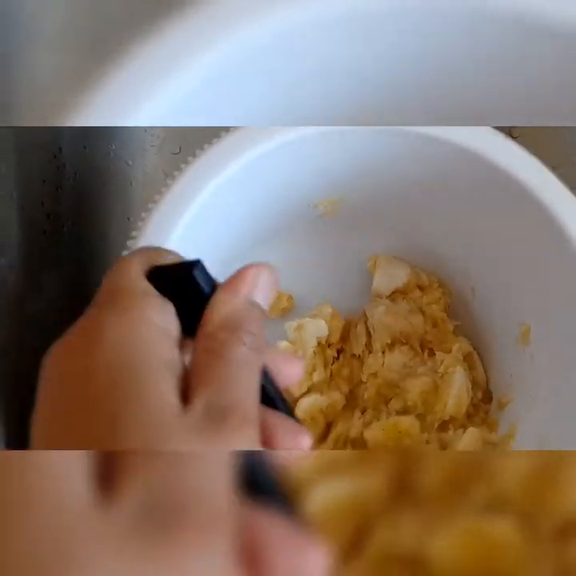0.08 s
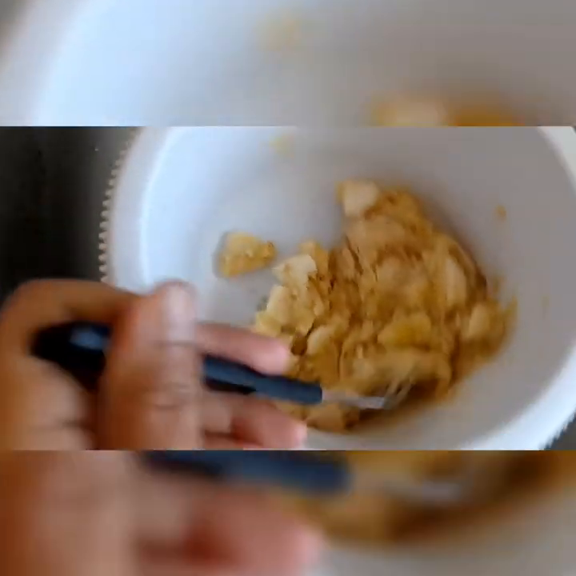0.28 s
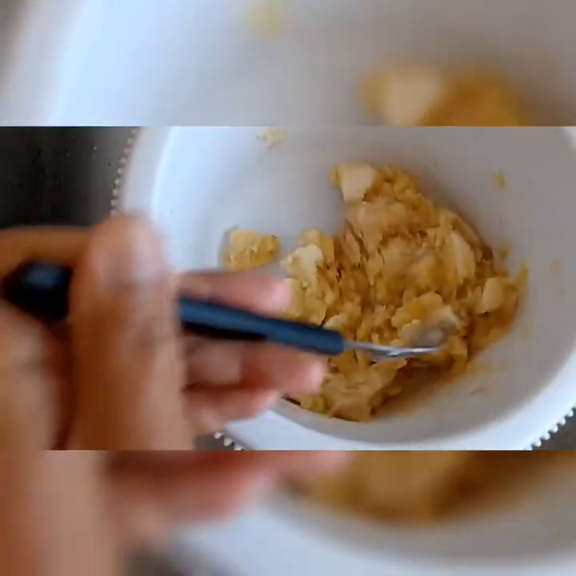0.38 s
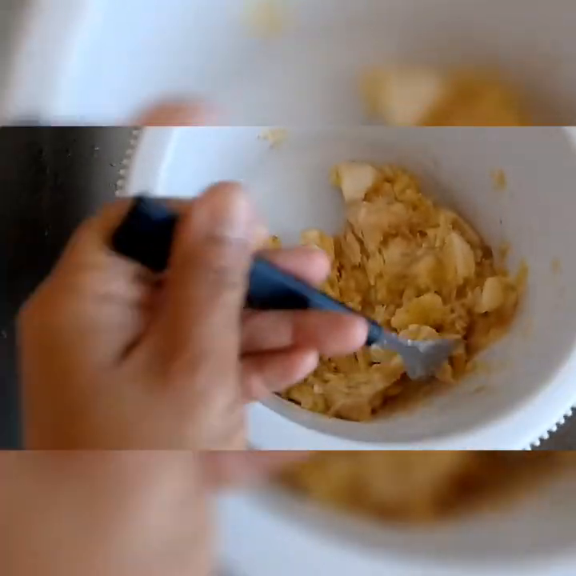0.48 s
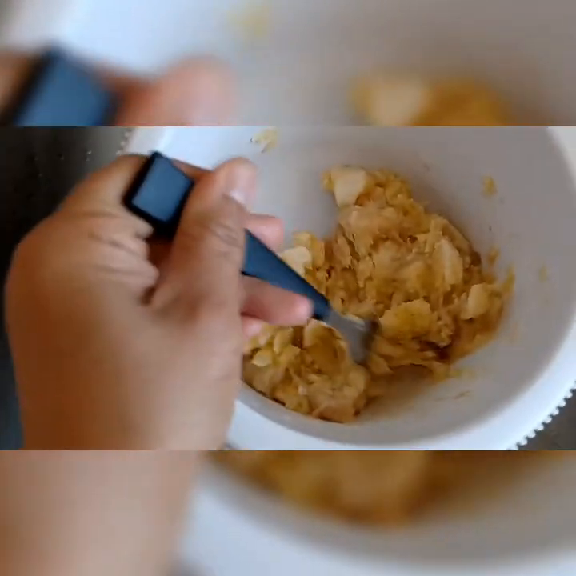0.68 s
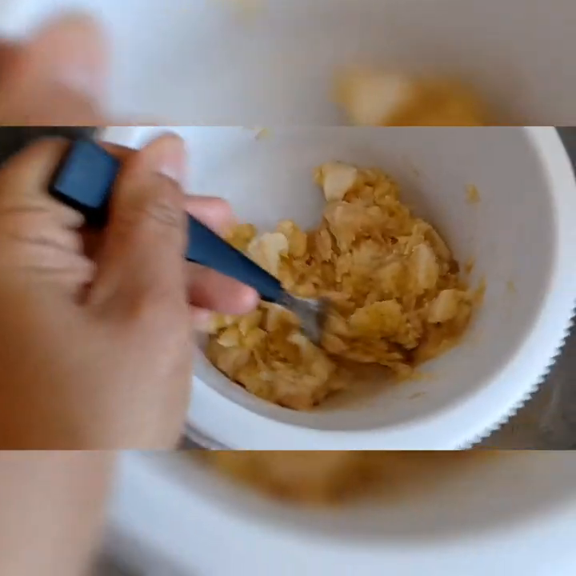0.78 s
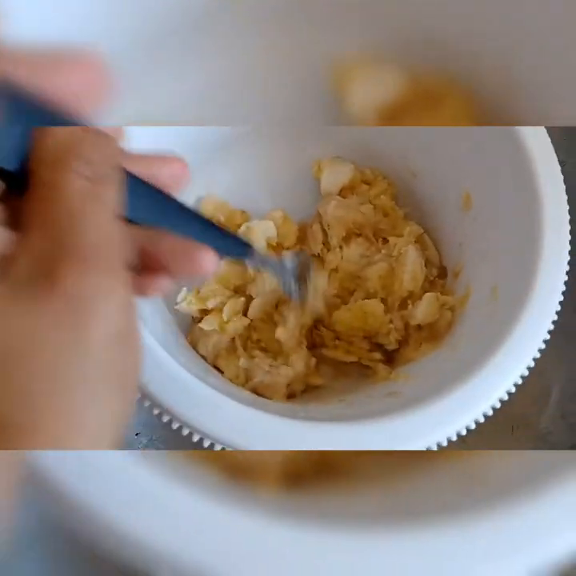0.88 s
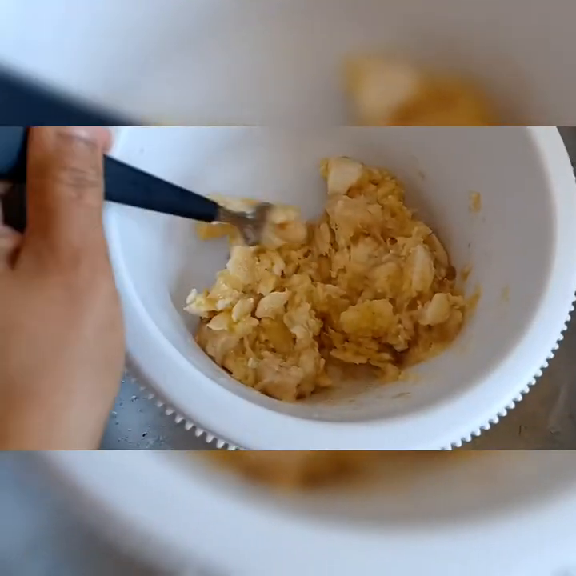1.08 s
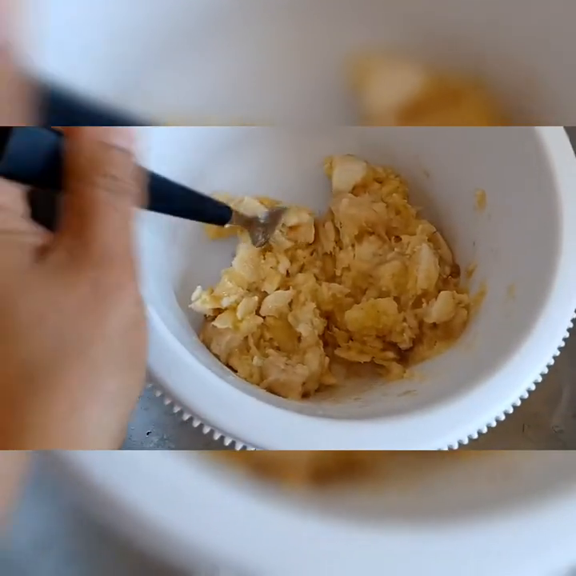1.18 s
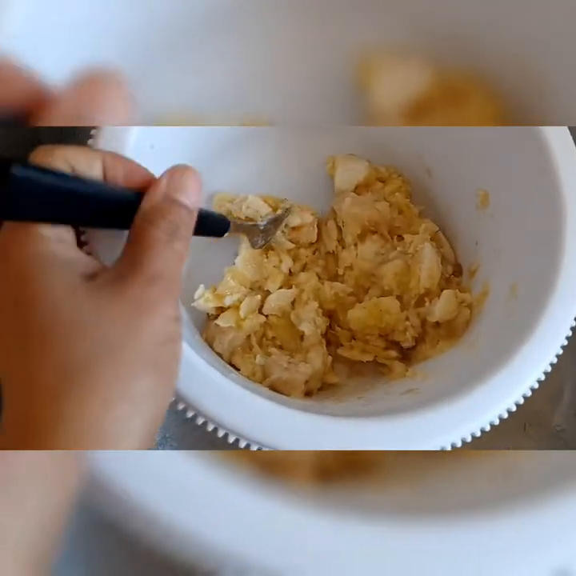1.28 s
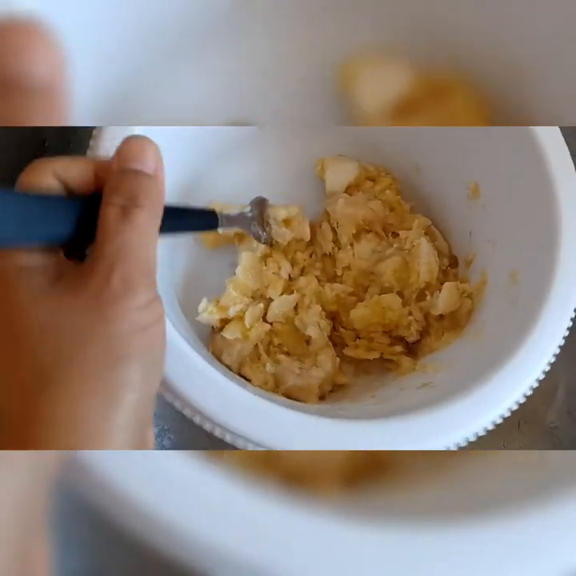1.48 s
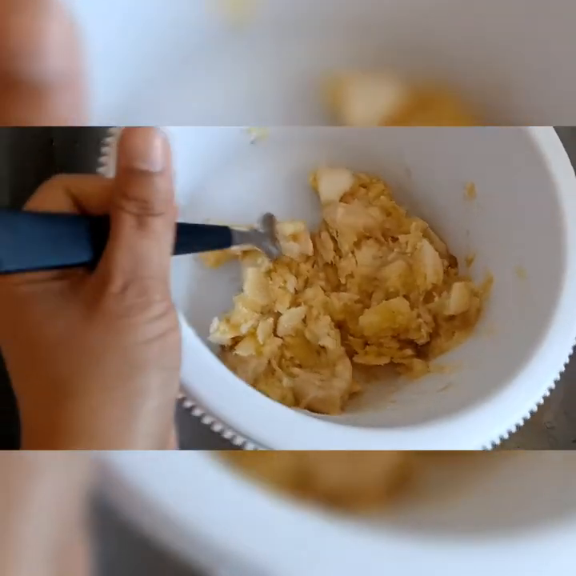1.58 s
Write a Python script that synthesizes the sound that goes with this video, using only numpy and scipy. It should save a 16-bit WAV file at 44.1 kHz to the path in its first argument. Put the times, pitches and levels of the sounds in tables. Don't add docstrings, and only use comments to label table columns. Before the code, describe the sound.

Fork mashing banana in a plastic bowl: gritty scrapes, hollow knocks, then a dull bump on the counter

```python
import sys
import numpy as np
from scipy import signal
from scipy.fft import rfft, irfft
from scipy.io import wavfile
from scipy.ndimage import uniform_filter1d

SR = 44100
rng = np.random.default_rng(int(sys.argv[2]) if len(sys.argv) > 2 else 0)


def log_audio(samples):
    frames = np.atleast_2d(samples).T
    limited = np.clip(frames, -1, 1)
    pcm = np.round(limited * 32767).astype(np.int16)
    wavfile.write(sys.argv[1], SR, pcm)


def elevation(decibels):
    levels = np.asarray(decibels, float)
    return 10 ** (levels / 20)


N = 70560

# pitch_hz, level_db, t60_s
EARLIER_CLINK = [(992, -50, 0.72), (1206, -39.5, 0.15), (1295, -46, 0.7)]
EARLIER_WIDTH_HZ = 35

# frequency_hz, density_db [dB per Hz]
HUSH_SPECTRUM = [(24, -50.5), (40, -10.5), (118, 14.5), (284, 1), (424, -2.5), (9320, -30), (16200, -17.5)]
HUSH_DB = -60.5

# time_s, pressure_db, wet_fizz_db, wall_contact_db
FIRST_STROKE = [
    (0, -43.5, -21, -4.5),
    (.11, -53.5, -5, -8.5),
    (.18, -58, -7, 12),
    (.208, -52.5, -8, 14),
]
SECOND_STROKE = [
    (0.215, -31, 0.98, 18.5),
    (0.237, -36, 1, 7),
    (0.276, -30.5, -2, -8),
    (.334, -41, 0.23, 5.5),
    (0.357, -33, 1, -7),
    (0.425, -29.5, 0.36, -3),
    (0.5, -42.5, 1, 2.5),
    (0.643, -71.5, 0.14, 11),
]
THIRD_STROKE = [
    (0.767, -68, 0.0056, -8),
    (0.792, -53, 0.0047, 3.5),
    (0.831, -40, 0, 7.5),
    (.87, -34.5, 0.0083, -9),
    (0.908, -34, 0, -4),
    (.958, -35.5, 0.0051, -1.5),
    (.99, -38.5, 0.0074, 1),
    (1.08, -53.5, 0.01, -3),
    (1.15, -65, 0.013, -25),
]
FOURTH_STROKE = [
    (1.46, -44, -6, 0.022),
    (1.492, -55, -10, 0.0041),
    (1.524, -67, 1, 0.0093),
    (1.554, -46.5, -7, 0.045),
    (1.6, -41.5, 0, 0),
]
# frequency_hz, density_db [dB per Hz]
RASP_SPECTRUM = [(500, -2), (800, -11), (1260, 6), (1420, -4), (1790, 6.5), (2720, 2), (3870, 5),
                 (6000, -0.5), (8500, -45)]
# frequency_hz, density_db [dB per Hz]
FIZZ_SPECTRUM = [(6500, -14), (8300, -10), (10500, -3), (13000, 0), (14800, -3), (15900, -10), (16300, -40)]
# pitch_hz, width_hz, level_db
FROTH_MODES = [(7060, 300, -7.5), (9970, 630, -10.5), (12500, 400, -17.5), (13500, 220, -23)]
# pitch_hz, width_hz, level_db
TINE_MODES = [(2600, 92, -10), (2926, 55, -7.5), (3240, 60, -11), (3643, 52, -4.5), (3947, 51, -8.5),
              (4490, 70, -9), (4933, 140, -8.5), (5380, 72, -10.5), (5710, 110, -11), (6630, 100, -12.5)]
# time_s, wall_pitch_hz, flex_pitch_hz, flex_level_db
LOAD_PATH = [(0, 267, 1300, -4.5), (.19, 280, 1300, -16.5), (.22, 448, 1830, -3), (.3, 452, 1800, -7.5),
             (.34, 470, 1834, 5.5), (.39, 438, 2020, -8), (.43, 420, 1850, -7.5), (.8, 399, 1850, 2.5),
             (.87, 392, 1790, 8.5), (.92, 428, 1610, 2), (.955, 388, 1590, 0.5), (.968, 330, 1848, 6),
             (1.1, 296, 1800, -18.5), (1.45, 303, 1800, -9), (1.6, 324, 1720, -1.5)]
# pitch_ratio, level_db, t60_share [share of the knock's t60]
WALL_MODES = [(1, 5, 1), (1.07, 0, 0.082), (1.55, -8, 0.33), (2.3, -12.5, 0.71), (2.8, -16.5, .3)]
FLEX_WIDTH_HZ = 62
SLIPS_PER_S, SLIP_SPREAD_DB = 20000, 1.5
GRIT_DB, GRIT_S = 3.0, .008
RASP_DB, TINES_DB, FIZZ_DB = -5, 5, -9.5
WALL_DB, BOOM_DB = -3, -5.5
RUMBLE_HZ, RUMBLE_DB = 56.6, -19.5

# start_s, level_db, pitch_hz, t60_s
COUNTER_BOOMS = [(0, -48, 107, 1), (0.128, -24, 111, 0.04), (0.158, -30.5, 121, .1),
                 (0.186, -40, 112, 0.23), (0.215, -25, 122.8, 0.35), (0.249, -18.5, 115.5, 0.25),
                 (0.356, -27, 123.3, 0.4), (0.511, -31, 123.2, 0.33), (.8, -29.5, 136.6, 0.13),
                 (0.947, -32.5, 123, 0.14), (1.04, -41.5, 130.6, 0.14), (1.2191, -22, 117.6, 0.3),
                 (1.305, -31.5, 116.5, 0.24), (1.401, -28, 136, 0.046), (1.4509, -35, 111, 0.23),
                 (1.545, -34.5, 107, 0.23)]
BOOM_RISE_S = 0.0031
OVERTONE_RATIO, OVERTONE_DB = 1.8, -12

# start_s, level_db, centre_hz, length_s
PULP_TICKS = [(0.049, -41, 12400, 0.016), (0.0496, -35.5, 14100, 0.0071), (0.056, -55, 5900, .005),
              (0.06, -61, 7300, 0.0034), (0.091, -47, 13300, 0.045), (0.147, -53, 7700, 0.0023),
              (0.125, -35.5, 14500, 0.004), (0.145, -49, 9050, 0.0025), (0.185, -44, 12500, .012),
              (0.188, -45, 4500, .01), (0.198, -48, 14000, 0.0026), (0.454, -24, 12600, .01),
              (0.703, -65.5, 12900, 0.0031), (0.734, -58.5, 13100, 0.023), (.718, -67, 12900, 0.0046),
              (0.771, -48, 5000, 0.0051), (0.778, -45, 11050, .006), (0.785, -40, 4000, 0.0057),
              (1.441, -49, 3240, 0.012), (1.464, -44, 11600, 0.023), (1.457, -42, 5000, 0.0067),
              (1.465, -31.5, 4500, 0.0074), (1.47, -40, 5200, 0.0057), (1.477, -25.5, 1390, 0.018),
              (1.48, -42, 3020, 0.0079)]
TICK_WIDTH_SHARE, TICK_RISE_SHARE = .8, .12

# start_s, ring_db, wall_pitch_hz, crack_db, ring_t60_s
WALL_KNOCKS = [(0.209, -29.5, 480, -51, 0.045), (.2135, -14.5, 447.8, -39, 0.14),
               (0.2147, -20, 223.5, -58, 0.046), (.247, -25, 473.7, -57.5, 0.16),
               (0.355, -19, 419, -45.5, 0.054), (0.362, -14.5, 423, -44.5, 0.05),
               (.358, -19, 778, -40.5, 0.049), (.361, -28, 622, -62, 0.19), (.385, -26.5, 686, -47, 0.14),
               (.387, -20, 438, -39, 0.068), (.426, -25, 383, -41, 0.031), (.485, -28.5, 220, -55, 0.031),
               (0.7623, -38, 388, -82.5, 0.042), (0.851, -23.5, 411.6, -48.5, 0.059),
               (.855, -27.5, 636, -74, 0.065), (0.901, -40, 425, -44.5, 0.012),
               (.916, -30, 433, -58, 0.026), (0.9621, -30.5, 316.5, -34.5, 0.18),
               (0.964, -40.5, 561, -39.5, 0.11), (1.04, -48, 306, -72, 0.093),
               (1.4785, -22.5, 307, -78, 0.0057), (1.552, -44, 338, -58, 0.025)]
CRACK_S, CRACK_RISE_S, PUSH_S = 0.0099, 0.0015, 0.0009

# start_s, pitch_hz, level_db, t60_s
SINGLE_CLINKS = [(0.2115, 1180, -27, 0.062), (.2135, 980, -46, 0.018), (.2135, 2280, -15.5, 0.016),
                 (0.2137, 6110, -20.5, 0.033), (.2202, 454, -16, 0.0524), (0.284, 468, -35, 0.15),
                 (.27, 250, -31, 0.12), (.41, 640, -30, 0.056), (0.358, 1060, -47, .05),
                 (0.358, 1800, -38, 0.034), (0.836, 410, -36, 0.08), (.838, 626, -28.5, 0.063),
                 (0.898, 3816, -24.5, 0.071), (.915, 408, -31, 0.039), (.965, 1870, -27, 0.066),
                 (.963, 3770, -23, 0.029), (0.962, 4760, -25.5, 0.076), (.985, 547, -37.5, 0.056),
                 (1.228, 190.4, -33, 0.11), (1.403, 222, -34, 0.059), (1.4785, 660, -37, 0.012),
                 (1.4776, 1280, -37, 0.024), (1.4776, 1860, -35.5, 0.029)]
CLINK_RISE_S = 0.0014

# pitch_hz, level_db, t60_s
BASE_MODES = [(270, -6.5, 0.035), (418, -6.5, 0.022), (640, 9, 0.011), (1000, 7.5, 0.0015),
              (1300, 1.5, 0.025), (2100, -4.5, 0.046), (2670, 3.5, .006)]
# frequency_hz, density_db [dB per Hz]
THUD_SPECTRUM = [(250, 1), (500, 4), (1300, -3.5), (2500, -7.5), (4500, -15), (7000, -18.5), (9000, -35.5),
                 (15000, -27)]
BUMP_S, BUMP_DB, BUMP_RISE_S = 1.2114, -24, .0005
THUD_DB, THUD_S = -28, .005
RATTLE_DB, RATTLE_S = -13.5, 0.075

# frequency_hz, t60_s
KITCHEN_T60 = [(100, 0.34), (500, 0.35), (2000, 0.53), (6000, 0.57), (14000, 0.11)]
# frequency_hz, level_db
KITCHEN_TONE = [(110, -17), (220, -9), (400, -1.5), (800, -6), (3000, -9.5)]
KITCHEN_DB = -15.5

EDGE_HZ = 16000


def evened(x):
    return x / np.sqrt(np.mean(x ** 2) + 1e-20)


def read(points, hz):
    f, value = np.transpose(points)
    return np.interp(np.log(hz + 1), np.log(f + 1), value)


def colour(x, points):
    hz = np.fft.rfftfreq(len(x), 1 / SR) + 1
    octaves_below = np.maximum(np.log2(points[0][0] / hz), 0)
    octaves_above = np.maximum(np.log2(hz / points[-1][0]), 0)
    gain = elevation(read(points, hz) - 40 * (octaves_below + octaves_above))
    return irfft(rfft(x) * gain, len(x))


def add(mix, s, sound):
    part = mix[round(s * SR):][:len(sound)]
    part += sound[:len(part)]


def resonate(x, hz, width):
    turn = np.exp(2j * np.pi * np.cumsum(hz * np.ones(len(x))) / SR)
    r = np.exp(-np.pi * abs(width) / SR)
    envelope = signal.lfilter([1 - r], [1, -r], x / turn)
    return 2 * (turn * envelope).real


def ring(hz, db, t60, rise):
    t = np.arange(SR // 2) / SR
    decay = elevation(db - 60 * t / max(t60, .003))
    onset = 1 - np.exp(-t / abs(rise))
    return decay * onset * np.sin(2 * np.pi * hz * t)


def earlier():
    t = np.arange(N) / SR
    out = np.zeros(N)
    for hz, db, t60 in EARLIER_CLINK:
        tone = evened(resonate(rng.standard_normal(N), hz, EARLIER_WIDTH_HZ))
        out += elevation(db - 60 * t / t60) * tone
    return out


def hush():
    return elevation(HUSH_DB) * evened(colour(rng.standard_normal(N), HUSH_SPECTRUM))


def slips():
    strength = elevation(SLIP_SPREAD_DB * np.minimum(rng.exponential(1, N), 4))
    slipping = rng.random(N) < SLIPS_PER_S / SR
    return evened(rng.standard_normal(N) * strength * slipping)


def grit(count):
    size = round(GRIT_S * SR)
    swell = uniform_filter1d(uniform_filter1d(rng.standard_normal(count), size), size)
    return elevation(GRIT_DB * evened(swell))


def load(t, axis):
    path = np.array(LOAD_PATH)
    return np.interp(t, path[:, 0], path[:, axis])


def steel(x, t):
    n = len(x)
    tines = sum(elevation(db) * resonate(x * grit(n), hz, width) for hz, width, db in TINE_MODES)
    flex = resonate(x * grit(n), load(t, axis=2), FLEX_WIDTH_HZ)
    tines = tines + elevation(load(t, axis=3)) * flex
    rasp = elevation(TINES_DB) * tines * 2 + colour(x, RASP_SPECTRUM) * elevation(RASP_DB) * 2
    froth = sum(elevation(db) * resonate(x * grit(n), hz, width) for hz, width, db in FROTH_MODES)
    return rasp, colour(x, FIZZ_SPECTRUM) + froth


def strokes():
    t, out = np.arange(N) / SR, np.zeros(N)
    rasp, fizz = map(evened, steel(slips(), t))
    noise = slips()
    wall_pitch = load(t, axis=1)
    wall = evened(sum(elevation(db) * resonate(noise, wall_pitch * k, 45 * k) for k, db, _ in WALL_MODES[:3]))
    boom = evened(resonate(resonate(noise, 124.4, 41), 131, 110))
    rumble = evened(resonate(resonate(noise, RUMBLE_HZ, 35), RUMBLE_HZ, 35))
    low = elevation(WALL_DB) * wall + elevation(BOOM_DB) * boom + elevation(RUMBLE_DB) * rumble
    for rows in (FIRST_STROKE, SECOND_STROKE, THIRD_STROKE, FOURTH_STROKE):
        s, *levels = np.transpose(rows)
        press_db, fizz_db, wall_db = [np.interp(t, s, level) for level in levels]
        touching = 1. * (t >= s[0]) * (t <= s[-1])
        on = uniform_filter1d(touching, size=200, mode="nearest")
        contact = rasp + elevation(FIZZ_DB + fizz_db) * fizz + elevation(wall_db) * low
        out += on * elevation(press_db) * contact
    return out


def counter():
    out = np.zeros(N)
    for s, db, hz, t60 in COUNTER_BOOMS:
        add(out, s, ring(hz, db, t60, BOOM_RISE_S))
        add(out, s, ring(hz * OVERTONE_RATIO, db + OVERTONE_DB, t60 / 2, BOOM_RISE_S))
    return out


def pulp():
    out, t = np.zeros(N), np.arange(2048) / SR
    for s, db, hz, length in PULP_TICKS:
        decay = np.exp(-2 * t / abs(length))
        rise = np.minimum(t / (TICK_RISE_SHARE * abs(length)), 1)
        burst = rng.standard_normal(len(t)) * decay * rise
        width = min(hz * TICK_WIDTH_SHARE, 5000)
        add(out, s, elevation(db) * resonate(resonate(burst, hz, width), hz, width))
    return out


def knocks():
    out, t = np.zeros(N), np.arange(4096) / SR
    envelope = np.exp(-t / CRACK_S) * (1 - np.exp(-t / CRACK_RISE_S))
    for s, db, hz, crack_db, t60 in WALL_KNOCKS:
        rasp, fizz = steel(rng.standard_normal(len(t)) * envelope, s + t)
        crack = evened(rasp) + .5 * evened(fizz)
        add(out, s, elevation(crack_db) * crack * (1 - t / t[-1]))
        for ratio, mode_db, share in WALL_MODES:
            add(out, s, ring(hz * ratio, db + mode_db, t60 * share, PUSH_S))
    return out


def clinks():
    out = np.zeros(N)
    for s, hz, db, t60 in SINGLE_CLINKS:
        add(out, s, ring(hz, db, t60, CLINK_RISE_S))
    return out


def bump():
    out, t = np.zeros(N), np.arange(SR // 4) / SR
    noise = evened(colour(rng.standard_normal(len(t)), THUD_SPECTRUM))
    rise = np.minimum(t / 0.00056, 1)
    decay = np.exp(-t / THUD_S) + elevation(RATTLE_DB) * np.exp(-t / RATTLE_S)
    add(out, BUMP_S, elevation(THUD_DB) * noise * rise * decay)
    for hz, db, t60 in BASE_MODES:
        add(out, BUMP_S, -ring(hz, BUMP_DB + db, t60, BUMP_RISE_S))
    return out


def kitchen(x):
    taps = np.zeros(SR)
    at = np.arange(300, SR - 20, 20)
    taps[at + rng.integers(0, 20, len(at))] = rng.choice([-1., 1.], len(at))
    hz, t, z = signal.stft(taps, SR, nperseg=256)
    decay_db = read(KITCHEN_TONE, hz)[:, None] - 60 * t / read(KITCHEN_T60, hz)[:, None]
    tail = signal.istft(z * elevation(decay_db), SR, nperseg=256)[1]
    return signal.fftconvolve(x, tail / np.linalg.norm(tail))[:N]


def scene():
    near = strokes() + counter() + pulp() + knocks() + bump()
    room = elevation(KITCHEN_DB) * kitchen(near)
    return (near + room + clinks() + earlier() + hush())[None]


def top_cut(x):
    return signal.sosfilt(signal.butter(12, 16450, fs=SR, output="sos"), x)


def record(dry):
    bassless = signal.lfilter(*signal.butter(4, 62, "high", fs=SR), dry)
    edge = signal.firwin(255, EDGE_HZ, window=("kaiser", 8), fs=SR)[None]
    mix = signal.oaconvolve(bassless, edge, "same")
    return top_cut(mix)


dry = scene()
out = record(dry)
log_audio(out)
```